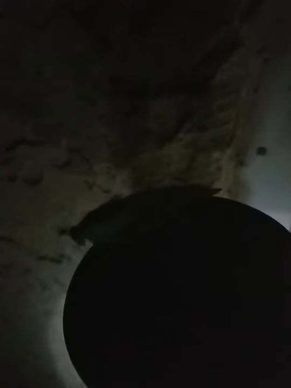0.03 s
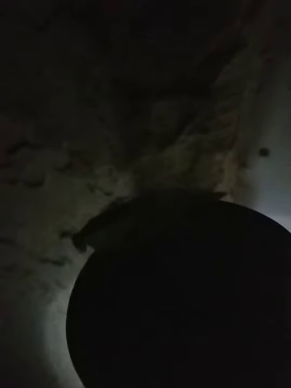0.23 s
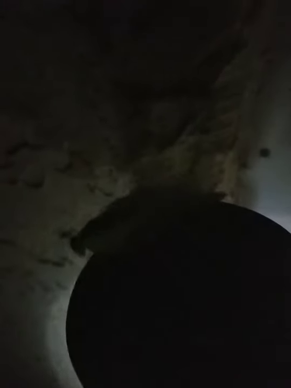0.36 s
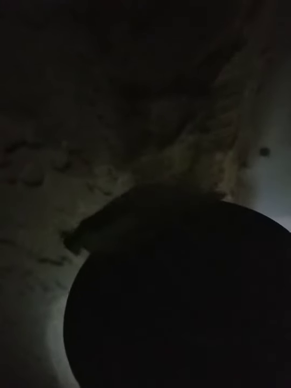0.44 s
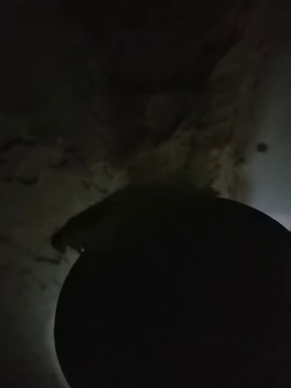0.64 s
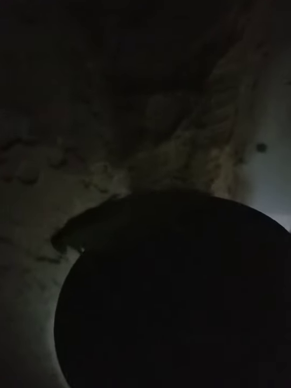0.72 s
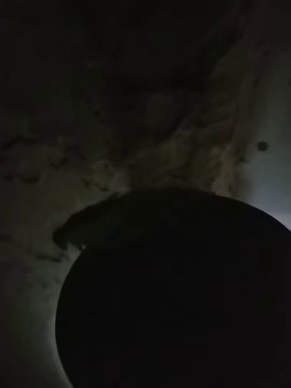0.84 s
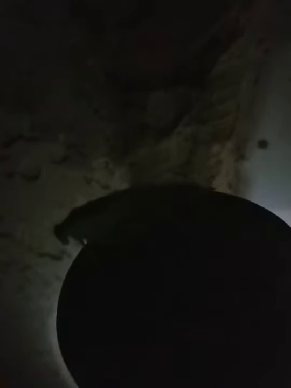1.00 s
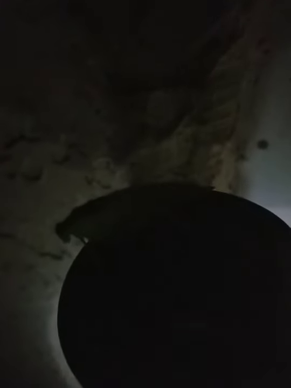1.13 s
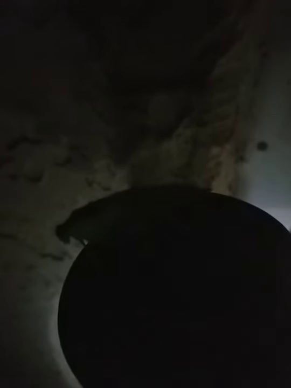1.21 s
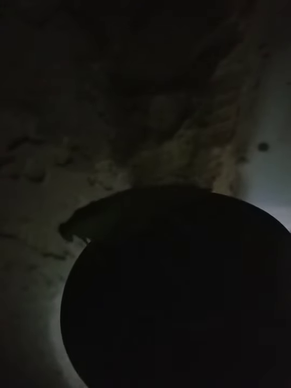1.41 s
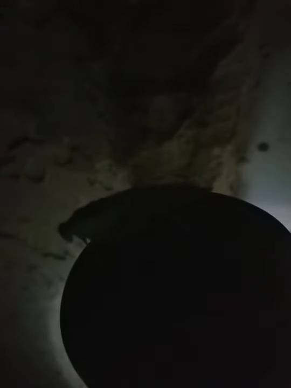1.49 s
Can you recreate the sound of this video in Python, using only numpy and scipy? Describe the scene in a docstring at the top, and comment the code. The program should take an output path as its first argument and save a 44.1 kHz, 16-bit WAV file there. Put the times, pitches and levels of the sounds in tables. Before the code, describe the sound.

An insect gives five short, sharp rasping chirps close to the microphone, with a slight echo from a nearby wall. A soft rumble and hum drop away as it starts, and very faint night background follows.

```python
"""Night by a porch: a deep rumble, a low hum and a thin far hiss, which drop away as a katydid begins.
Close by on a wall, it raises its wings with two faint ticks and gives five rasping chirps by stridulation.
In each the wings flick open, then close with the scraper catching tooth after tooth of the file,
and part with a few snaps; every contact rings the wings. The wall and porch answer briefly,
and for the last second the faint background is left."""
import sys
import numpy as np
from scipy import signal
from scipy.fft import rfft, irfft, next_fast_len
from scipy.io import wavfile
from scipy.ndimage import uniform_filter1d, minimum_filter1d

SR = 44100
rng = np.random.default_rng(int(sys.argv[2]) if len(sys.argv) > 2 else 0)


def dump(signal):
    """Clip the signal to [-1, 1] and save it as 16-bit WAV at the path in sys.argv[1]."""
    limited = np.clip(np.atleast_2d(signal).T, -1, 1)
    pcm = np.round(limited * 32767).astype(np.int16)
    wavfile.write(sys.argv[1], SR, pcm)


N = 68355
TIME = np.arange(N) / SR
SIZE = next_fast_len(2 * N)
HZ = np.maximum(np.arange(SIZE // 2 + 1) * SR / SIZE, 1)
PORCH_T60_S = 0.11

# wing strokes: (opening start [s], closing start [s], closing duration [s], closing level [dB],
# opening level [dB], opening swell [dB], low rasp level [dB], low rasp swell [dB]); levels are relative
CHIRPS = [(0.2404, 0.2537, 0.039, 3, -0.5, 8, -3.5, 4.5), (0.3204, .3279, .042, 1.7, -3.5, 9, 1, 13.5),
          (.4120, 0.4209, .040, -0.5, -5.5, 7.5, 4.5, 17),
          (0.5045, 0.5099, 0.047, -0.5, -6.5, 6.5, 1.5, 18), (0.5995, 0.605, .042, -0.83, -5, 8.5, 6, 25)]


def from_db(db):
    """Amplitude grows tenfold for every 20 dB."""
    return 10 ** (np.asarray(db) / 20)


def at_hz(points):
    """Interpolation of a table along a logarithmic frequency axis."""
    hz, value = np.transpose(points)
    return np.interp(np.log(HZ), np.log(hz), value)


def pan(db):
    """A level difference, left minus right, is shared equally between the channels."""
    return from_db(db * np.array([[.5], [-.5]]))


def through(x, response):
    """Linear filtering multiplies the spectrum by a frequency response."""
    return irfft(rfft(x, SIZE) * response, SIZE)[..., :N]


def distant_noise(spectrum, level, side_db):
    """Filtered noise under a level curve; a stronger side signal makes the channels less alike."""
    mid, side = through(rng.standard_normal((2, N)), from_db(at_hz(spectrum)))
    stereo = (mid + from_db(side_db) * side * np.array([[1], [-1]])) / mid.std()
    return stereo * from_db(np.interp(TIME, *np.transpose(level)))


def rumble():
    """Noise concentrated near 60-120 Hz, almost fully coherent between the channels."""
    # rumble spectrum: (frequency [Hz], relative density [dB])
    spectrum = [(25, -31.5), (42, -19.5), (64, 2), (85, 1), (120, -1.5), (160, -11.5), (300, -35),
                (1000, -80.5)]
    # rumble envelope: (time [s], level [dB])
    level = [(0, -44.5), (.1, -41.5), (.234, -37.5), (.246, -68.5), (.275, -61), (.305, -46), (.33, -70.5),
             (.69, -70), (.77, -61), (1.0, -64), (1.07, -66.5), (1.16, -62.5), (1.25, -70), (1.34, -67),
             (1.441, -68.5), (1.55, -61.5)]
    return distant_noise(spectrum, level, side_db=-23)


def hum():
    """Noise with a spectral peak near 225 Hz is heard as a low hum."""
    # hum spectrum: (frequency [Hz], relative density [dB])
    spectrum = [(30, -38), (100, -11), (160, -5), (225, 0), (300, -13.5), (480, -16.5), (700, -14),
                (1000, -23.5), (1250, -23), (1550, -37.5), (1950, -40), (3500, -49), (8000, -53.5),
                (15500, -54)]
    # hum envelope: (time [s], level [dB])
    level = [(0, -38), (.12, -40), (0.232, -38.5), (.244, -59), (.35, -67), (.68, -69.5), (.76, -66.5),
             (1.05, -63), (1.15, -67), (1.26, -67), (1.34, -62.5), (1.42, -65.5), (1.55, -64)]
    return distant_noise(spectrum, level, side_db=-12.5)


def hiss():
    """Narrow noise bands near 2.6 and 4.6 kHz sound wide because the channels are incoherent."""
    # hiss spectrum: (frequency [Hz], relative density [dB])
    spectrum = [(1500, -37.5), (2000, -24.5), (2320, -19.5), (2570, 0), (2800, -5), (3150, -16.5),
                (3600, -27.5), (4100, -24.5), (4600, -1.5), (4900, -4), (5400, -20), (5800, -10),
                (6400, -25), (7800, -25.5), (9000, -31), (15500, -33)]
    # hiss envelope: (time [s], level [dB])
    level = [(0, -48.5), (.232, -48), (0.24, -61.5), (.6, -54), (.69, -56.5), (.77, -71.5), (1.102, -74),
             (1.55, -73)]
    return distant_noise(spectrum, level, side_db=.5)


def clicks(times, db):
    """Each brief contact acts as an impulse."""
    return np.bincount((np.asarray(times) * SR).astype(int), from_db(db), N)[:N]


def teeth(start, length, per_s, jitter=.15):
    """Quasi-periodic tooth strikes: their times, shares of the stroke and level scatter in dB."""
    unevenness, scatter_db = rng.standard_normal((64, 2)).T
    gaps = np.clip(1 + jitter * unevenness, .2, 2) / per_s
    elapsed = np.cumsum(gaps) - gaps[0]
    inside = elapsed < length
    return start + elapsed[inside], elapsed[inside] / length, scatter_db[inside]


def friction(contacts, apart_db=-4, grit_db=-4.5, decay_s=.0002):
    """Friction adds a puff of noise to each contact; apart_db sets the part unique to each channel."""
    pole = np.exp(-1 / (decay_s * SR))
    power = signal.lfilter([(1 - pole) ** 2], [1, -2 * pole, pole * pole], contacts ** 2 + 1e-18)
    noise = rng.standard_normal(N) + from_db(apart_db) * rng.standard_normal((2, N))
    return contacts + from_db(grit_db) * np.sqrt(power) * noise


def resonator(spectrum):
    """Folding the cepstrum gives the causal, minimum-phase response of a body with this spectrum."""
    cepstrum = irfft(np.log(from_db(at_hz(spectrum))), SIZE)
    cepstrum[1:SIZE // 2] *= 2
    cepstrum[SIZE // 2 + 1:] = 0
    return np.exp(rfft(cepstrum))


def wing(spectrum, spread_s=.0007, step_hz=700):
    """A dispersive resonator: the group delay of the wing's ring varies randomly with frequency."""
    knots = np.arange(0, SR, step_hz)
    delay = spread_s * np.interp(HZ, knots, rng.random(len(knots)))
    return resonator(spectrum) * np.exp(-2j * np.pi * np.cumsum(delay) * SR / SIZE)


def wings_opening():
    """Impulse excitation: two faint ticks, then a swelling run of strikes as each chirp opens."""
    # ticks as the wings are raised: (time [s], relative level [dB])
    ticks = [(.1988, -32.5), (0.2017, -28.5)]
    # resonances of the opening wings: (frequency [Hz], gain [dB])
    spectrum = [(1000, -32), (3800, -35), (5500, -26), (7300, -15.5), (8000, -1.5), (9200, -9), (11000, 0),
                (13200, -3.5), (14500, -14.5), (15500, -7.5)]
    turn_s = .0024  # pause between opening and closing
    contacts = clicks(*np.transpose(ticks))
    for opens, closes, _, _, db, swell_db, _, _ in CHIRPS:
        times, share, scatter_db = teeth(opens, closes - turn_s - opens, per_s=880)
        contacts += clicks(times, db + scatter_db - swell_db * (1 - share) ** 2)
    return from_db(10) * pan(-10.5) * through(friction(contacts), wing(spectrum))


def wings_closing():
    """Stridulation: the scraper hits each tooth, and a weaker reflection of each strike follows within about a
    millisecond. Returns the ring and the rasp's impulses."""
    # resonances of the closing wings: (frequency [Hz], gain [dB])
    spectrum = [(1000, -51), (3800, -39), (5200, -20.5), (6100, -14), (7200, -11), (7500, -7), (7750, -1),
                (8000, 0.5), (8400, -6), (9000, -12), (9400, -9.5), (9900, -15.5), (10700, -5), (11200, -9),
                (11800, -7), (12700, -8.5), (13400, -14), (14600, -10.5), (15500, -20.5)]
    # balance of the closing wings: (frequency [Hz], left minus right [dB])
    balance = [(4000, -4), (6500, 1.5), (7900, -1.5), (9200, -2.5), (11000, -2.5), (13000, -6.5),
               (15500, 1)]
    peak_share, arch_db = .27, 7.5  # the level follows a parabola over the stroke
    second_pulse_s, second_pulse_db = .0008, -5.5
    contacts, rasp_drive = np.zeros((2, N))
    for _, start, length, db, _, _, rasp_db, swell_db in CHIRPS:
        times, share, scatter_db = teeth(start, length, per_s=450)
        force_db = db + scatter_db - arch_db * (share - peak_share) ** 2
        second_pulses = times + second_pulse_s * rng.uniform(.6, 1.4, len(times))
        contacts += clicks(times, force_db) + clicks(second_pulses, force_db + second_pulse_db)
        rasp_drive += clicks(times, rasp_db + scatter_db - swell_db * (1 - share) ** 1.3)
    ring = through(friction(contacts), wing(spectrum) * pan(at_hz(balance)))
    return from_db(15) * ring, rasp_drive


def low_rasp(contacts):
    """Forced vibration: the contacts drive the whole wing in a broad band below its ring."""
    # response of the whole wing: (frequency [Hz], gain [dB])
    spectrum = [(150, -42.5), (260, -21.5), (350, -3.5), (700, -3.5), (950, -6), (1300, 1), (1900, 1),
                (2700, -3.5), (3400, -2.5), (4100, -6), (5000, -2.5), (7000, -15.5), (12000, -32.5)]
    return from_db(-8) * pan(-3.5) * through(friction(contacts, apart_db=4.5), resonator(spectrum))


def wings_parting():
    """The scraper snaps free in three weakening touches. Returns the ring and the rasp's impulses."""
    # releases of the scraper: (time [s], relative level [dB], relative low rasp level [dB])
    snaps = [(0.2888, -0.5, -3.5), (0.2899, 3, -5.5), (0.2908, 4, -3.5), (0.3713, 4, 7), (0.3785, 3, 6),
             (.4204, -6, -13), (0.4671, 9, 3), (0.4697, -5, -3.5), (0.4757, -11, -23), (0.5566, -1.5, 5.5),
             (0.5562, -3, 0.5), (0.5626, -4, -19), (0.6515, 2, 4.5), (0.6545, -2.5, -27)]
    # resonances of the parting wings: (frequency [Hz], gain [dB])
    spectrum = [(1000, -44.5), (3500, -28.5), (4800, -17), (7300, -15), (8000, -3.5), (8800, -12.5),
                (9500, 4), (10200, -4), (10700, 1), (11200, 3), (12000, -11), (12800, 4.5), (13700, -3),
                (15500, -12.5)]
    step_s, loss_db = .0005, 2
    times, db, rasp_db = np.transpose(snaps)
    contacts = sum(clicks(times + k * step_s, db - k * loss_db) for k in range(3))
    ring = through(friction(contacts), wing(spectrum))
    return from_db(8.5) * pan(-2.5) * ring, clicks(times, rasp_db)


def echoes(db, t60_s):
    """Diffuse reflections act as noise that builds up and decays exponentially, apart in each channel."""
    build_up = 1 - np.exp(-TIME * 40 / t60_s)
    decay = from_db(-60 * np.minimum(TIME / t60_s, 4))
    tail = rng.standard_normal((2, N)) * decay * build_up
    energy = np.sum(tail ** 2, axis=1, keepdims=True)
    return from_db(db) * rfft(tail / np.sqrt(energy), SIZE)


def porch(ring):
    """Superposition of the direct ring, the near wall's reflections and the porch and yard's tails."""
    # phase between the microphone ports: (frequency [Hz], lead of the left [rad])
    port_phase = [(500, -2.9), (3000, 2.5), (6500, 1.02), (8000, 0.34), (10500, 0.77), (12000, -2.4),
                  (13000, -2), (15500, -2)]
    # colour of the porch and yard reflections: (frequency [Hz], gain [dB])
    colour = [(500, 2.5), (3000, 2), (5000, 3.5), (7000, 1), (7900, -4.5), (9200, 0.5), (11000, -0.5),
              (13000, 0), (15500, 1.5)]
    direct = np.exp(1j * at_hz(port_phase) * np.array([[1], [0]]))
    tails = resonator(colour) * (echoes(-14.5, PORCH_T60_S) + echoes(-43, t60_s=.5))
    wall = echoes(-10, t60_s=.022)
    return through(ring, direct + wall + tails)


def near_wall(rasp, lead_s=.00007):
    """A shorter path brings the rasp to the left port first; the wall and porch scatter it."""
    direct = np.exp(-2j * np.pi * HZ * lead_s * np.array([[0], [1]]))
    wall = echoes(-3, t60_s=.0059)
    return through(rasp, direct + wall + echoes(-12, PORCH_T60_S))


def scene():
    """Sound pressures add: the night background, the katydid and its reflections."""
    night = rumble() + hum() + hiss()
    opening = wings_opening()
    closing, tooth_drive = wings_closing()
    snaps, snap_drive = wings_parting()
    rasp = low_rasp(tooth_drive + snap_drive)
    return night + porch(opening + closing + snaps) + near_wall(rasp)


def record(dry):
    """Peak limiting lowers the gain briefly near full scale; a steep low-pass then cuts the top."""
    ceiling_db, window_s, cutoff_hz = -.5, .002, 15850
    span = int(window_s * SR)
    allowed_gain = np.minimum(1, from_db(ceiling_db) / (np.abs(dry).max(axis=0) + 1e-9))
    gain = uniform_filter1d(minimum_filter1d(allowed_gain, span), span)
    return through(dry * gain, 1 / np.sqrt(1 + (HZ / cutoff_hz) ** 240))


dry = scene()
out = record(dry)
dump(out)
```